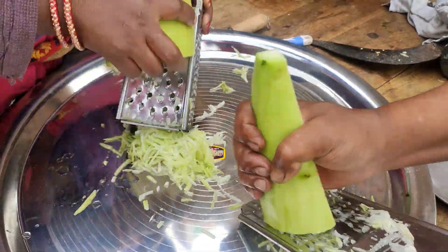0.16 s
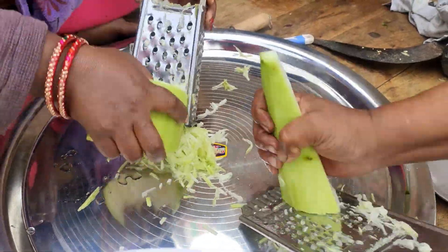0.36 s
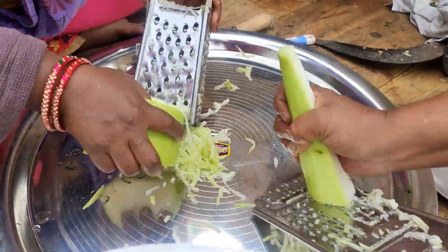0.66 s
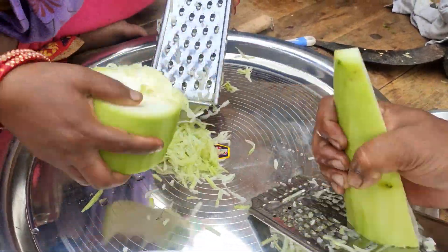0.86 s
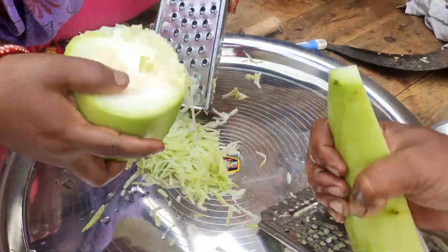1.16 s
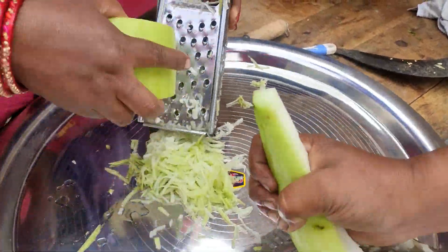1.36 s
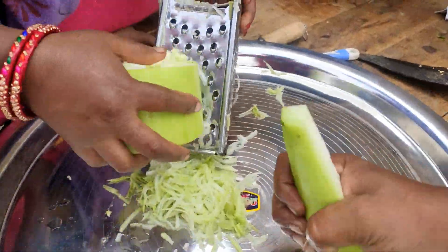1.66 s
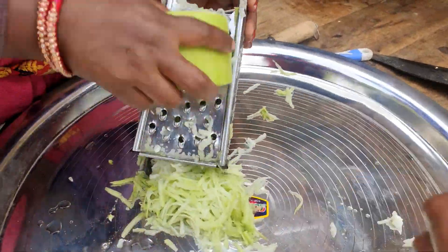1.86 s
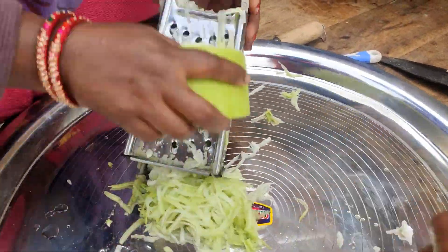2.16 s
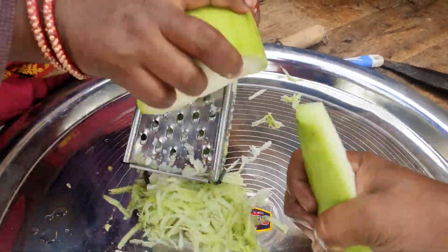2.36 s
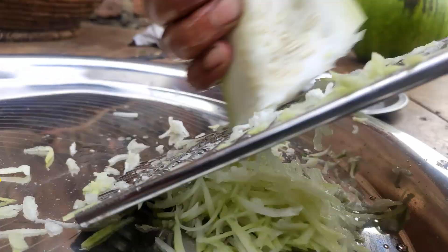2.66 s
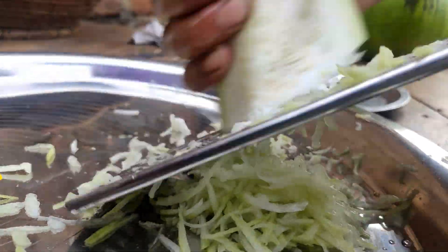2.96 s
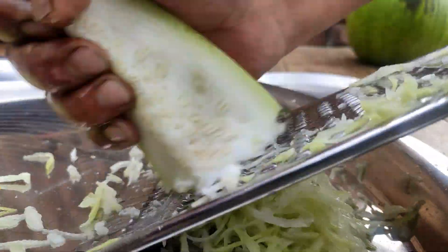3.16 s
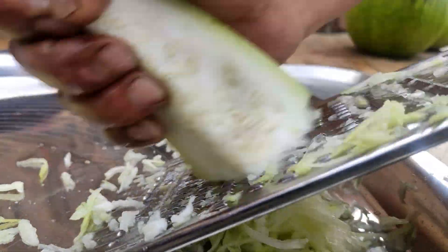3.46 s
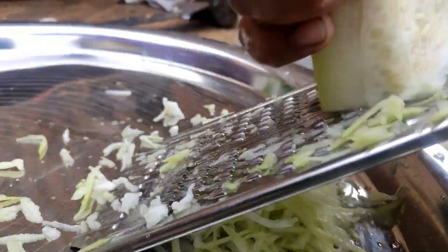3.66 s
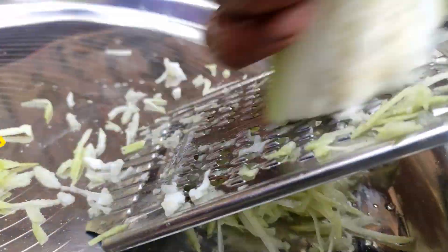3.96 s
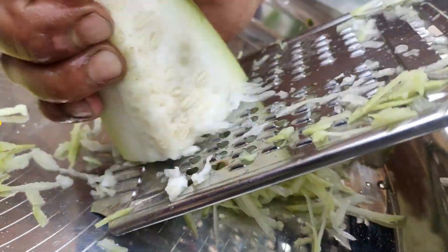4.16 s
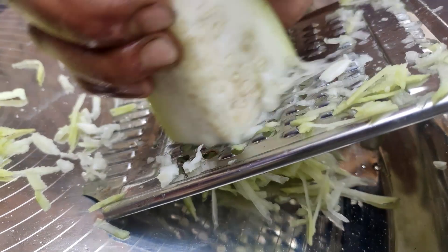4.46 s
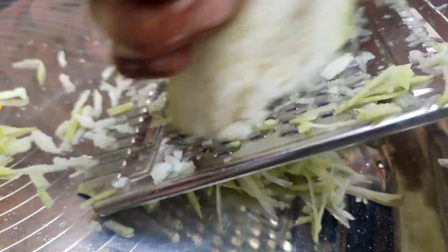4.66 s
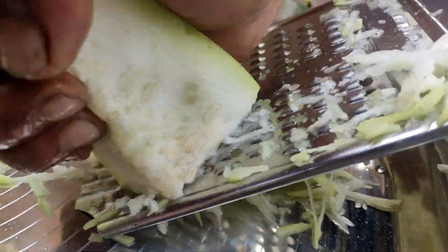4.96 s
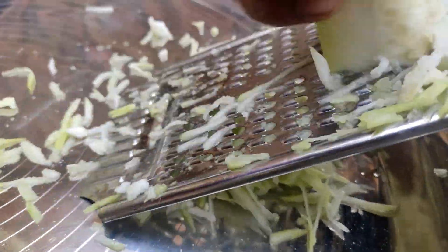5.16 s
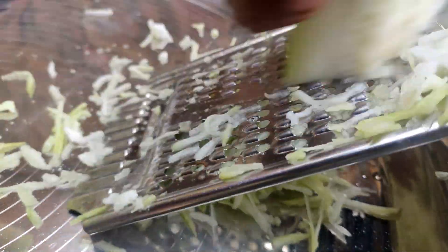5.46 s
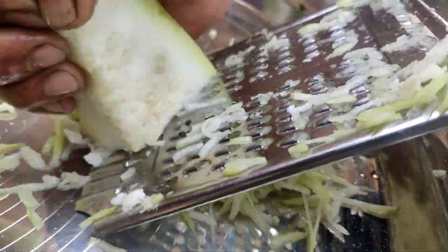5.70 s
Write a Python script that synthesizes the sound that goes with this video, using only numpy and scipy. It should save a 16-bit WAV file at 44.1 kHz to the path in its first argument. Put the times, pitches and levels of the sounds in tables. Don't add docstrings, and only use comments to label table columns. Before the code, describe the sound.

Brisk irregular vegetable grating, heard right beside the plate: dense bright fibre-tearing crackle with a hollow, thin-sheet body. At first moderate strokes with bangle ticks and soft bumps, then a snaggy flurry near 2.8 seconds, a heavy slap and thud near 3.7, and stronger, wetter scraping with low jolts from about 4.9. Slight short reflections, wide treble, centred bass, almost silent yard air.

```python
import sys
import numpy as np
from scipy import signal
from scipy.fft import rfft, irfft, next_fast_len
from scipy.io import wavfile
from scipy.ndimage import uniform_filter1d

SR = 44100
rng = np.random.default_rng(int(sys.argv[2]) if len(sys.argv) > 2 else 0)


def output_pcm(signal):
    pcm = np.clip(np.atleast_2d(signal).T, -1, 1) * 32767
    wavfile.write(sys.argv[1], SR, np.round(pcm).astype(np.int16))


def ratio(d):
    e = np.asarray(d, float) / 20
    return 10 ** e


N = 257103

# pitch_hz, level_db [dB per Hz]
TEAR_COLOUR = [(880, -6.5), (1500, -7), (2450, -9.5), (4100, -6.5), (5600, -7), (10100, -5), (15000, -10.5),
               (17000, -17.5)]
# pitch_hz, level_db [dB per Hz]
SHEET_COLOUR = [(150, -59), (250, -0.5), (530, -23.5), (605, -8), (683, -9.5), (788, -8), (1210, -5),
                (1510, -6), (1820, -7.5), (3500, -11), (4550, -27), (7700, -120)]
# pitch_hz, level_db, t60_s
RIM_MODES = [(494, -10, .24), (520, -11, .07), (690, -2, .03), (754, -12, .06), (950, -4, .035),
             (1400, -8, .025)]


def evened(x):
    return x / np.sqrt(np.mean(x ** 2) + 1e-20)


def read(points, hz):
    f, value = np.transpose(points)
    return np.interp(np.log(hz + 1), np.log(f + 1), value)


def curves(rows):
    s, *columns = np.transpose(rows)
    return [np.interp(np.arange(N) / SR, s, column) for column in columns]


def add(mix, s, sound):
    part = mix[..., round(s * SR):][..., :sound.shape[-1]]
    part += sound[..., :part.shape[-1]]


def sides(db):
    return ratio(np.array([db / 2, -db / 2]))


def ring(hz, t60, rise):
    t = np.arange(round(.3 * SR)) / SR
    return (1 - np.exp(-t / rise)) * ratio(-60 * t / t60) * np.sin(2 * np.pi * hz * t)


def ports(a, b, spectrum):
    # pitch_hz, likeness [0 to 1]
    likeness = [(60, 1), (180, 1), (550, 1), (1200, 0.4), (2500, 0.1), (4970, 0.063), (15000, 0.041)]
    # pitch_hz, lead_rad
    port_lead = [(250, -0.58), (550, -1.03), (1210, -1.5), (1980, -2.5), (4000, -2.5)]
    size = next_fast_len(N)
    hz = np.fft.rfftfreq(size, 1 / SR)
    same = np.clip(read(likeness, hz), 0, 1)
    one, two = rfft(a, size), rfft(b, size)
    wide = (1 - np.sqrt(1 - same ** 2)) / 2
    along, across = np.sqrt(1 - wide), np.sqrt(wide)
    turn = np.exp(.5j * read(port_lead, hz))
    left = (along * one + across * two) * turn
    right = (along * two + across * one) / turn
    pair = np.array([left, right]) * ratio(read(spectrum, hz))
    return evened(irfft(pair, size)[:, :N])


def flicker(per_s, depth_db):
    width = max(int(SR / per_s), 1)
    lumps = uniform_filter1d(uniform_filter1d(rng.standard_normal(N), width), width)
    return ratio(depth_db * evened(lumps))


def crackle(spectrum, spread_db, shared):
    size = ratio(spread_db * np.minimum(rng.exponential(1, N), 4.5)) * shared
    left, right = size * rng.standard_normal((2, N))
    return ports(left, right, spectrum)


def patchy(x, depth_db, bins, frames):
    z = signal.stft(x, nperseg=256)[2]
    patches = uniform_filter1d(rng.standard_normal(z.shape[1:]), bins, 0)
    patches = evened(uniform_filter1d(patches, frames, 1))
    return evened(signal.istft(z * ratio(depth_db * patches), nperseg=256)[1][:, :N])


def drops(per_s, low_hz, high_hz, cycles, count):
    out = np.zeros((2, N))
    for hz in np.geomspace(low_hz, high_hz, count):
        grain = ring(hz, cycles / hz, 0.5 / hz)[:2000]
        pair = sides(rng.normal(0, 12.3))[:, None] * rng.choice([-1, 1], (2, 1)) * grain
        for place, luck in rng.random((int(per_s / count * N / SR), 2)):
            size_db = 3.7 * min(-np.log(1 - luck), 3)
            add(out, place * N / SR, ratio(size_db) * pair)
    return evened(out)


def hand(bluntness):
    # touch_s, speeding_up_s, slowing_down_s, tearing_db
    pushes = [(.04, 0.067, 0.1, -34.5), (.338, 0.06, 0.15, -34.5), (.61, 0.12, 0.12, -35),
              (.972, 0.079, 0.074, -42), (1.287, 0.083, 0.042, -35.5), (1.64, 0.063, 0.068, -36),
              (1.955, 0.079, 0.063, -30.5), (2.23, 0.094, 0.09, -38), (2.3, 0.057, 0.16, -39.5),
              (2.872, 0.06, 0.072, -33), (3.195, 0.068, 0.08, -34), (3.27, 0.059, .1, -36.5),
              (3.523, 0.054, 0.11, -35.5), (3.832, 0.095, 0.093, -38), (4.142, 0.12, 0.083, -37),
              (4.519, 0.057, .15, -35), (4.9, 0.076, 0.071, -27.5), (5.0, 0.038, 0.1, -39),
              (5.18, 0.079, 0.027, -28), (5.298, 0.12, 0.047, -30.5), (5.438, 0.055, 0.069, -27.5),
              (5.694, 0.06, 0.1, -27)]
    # touch_s, speeding_up_s, slowing_down_s, tearing_db
    drags = [(-.05, 0.041, 0.092, -49.5), (.172, 0.099, .02, -46.5), (.266, 0.063, 0.016, -51.5),
             (.484, 0.059, 0.11, -45.5), (.9, 0.042, 0.046, -47), (1.162, 0.019, 0.14, -52.5),
             (1.53, 0.042, 0.1, -50.5), (1.742, 0.02, 0.2, -54.5), (1.843, 0.061, 0.053, -43.5),
             (2.073, 0.049, .4, -49), (2.164, 0.033, 0.56, -46.5), (2.49, 0.083, 0.05, -40),
             (2.63, 0.048, 0.013, -38), (2.66, 0.1, 0.065, -56), (2.75, 0.032, 0.11, -47),
             (2.98, 0.02, 0.09, -55.5), (3.06, 0.038, 0.26, -45), (3.406, 0.03, 0.086, -39.5),
             (3.655, 0.1, .31, -48.5), (3.716, 0.03, 0.044, -42), (3.996, 0.11, 0.042, -42.5),
             (4.64, 0.024, 0.029, -50), (4.72, 0.045, 0.045, -56), (4.775, 0.041, 0.1, -43),
             (5.09, 0.039, 0.077, -45), (5.03, 0.035, 0.067, -51), (5.54, 0.017, .06, -53)]
    # touch_s, speeding_up_s, slowing_down_s, tearing_db
    skims = [
        (1.428, 0.0068, 0.057, -44),
        (4.348, 0.085, 0.079, -43),
        (5.53, .1, 0.071, -38.5),
    ]
    body_slope, usual_db = 0.21, -41
    tear, body = np.zeros(N), np.zeros(N)
    t = np.arange(N) / SR
    for passes, body_db in (pushes, -6), (drags, -2), (skims, -10.5):
        for touch, rise, fall, db in passes:
            fastest, lift = touch + rise, touch + rise + fall
            now = slice(max(round(touch * SR), 0), round(lift * SR))
            arch = np.interp(t[now], [touch, fastest, lift], [0, np.pi / 2, np.pi])
            speed = np.sin(arch) ** bluntness
            sheet_db = db + body_db - body_slope * (db - usual_db)
            tear[now] += (ratio(db) * speed) ** 2
            body[now] += (ratio(sheet_db) * speed) ** 2
    return np.sqrt(tear), np.sqrt(body)


def rasp():
    # time_s, left_right_db
    grater_lean = [(0, -0.5), (2, -.5), (3.5, -2), (4.5, -3), (5.1, 0.5), (5.83, 0.5)]
    # time_s, level_db
    free_rim = [(0, -3), (1.5, -19), (1.75, -11), (2.5, -8), (3.5, -4.5), (4.0, -1), (4.9, -6.5), (5.3, -5),
                (5.83, -2.5)]
    cut, press = hand(bluntness=1.335)
    rows = flicker(per_s=160, depth_db=.8) * flicker(per_s=45, depth_db=.8)

    snaps = crackle(TEAR_COLOUR, 1.8, rows * flicker(per_s=700, depth_db=1.2))
    tear = patchy(snaps, 2.14, bins=11, frames=5)
    tear = patchy(tear, 1.5, bins=2, frames=9)
    tear += ratio(-29.5) * drops(500, 3480, 13300, 53, count=14)

    body = patchy(crackle(SHEET_COLOUR, 1.9, rows), 2.9, bins=3, frames=5)
    body += ratio(-4.5) * drops(170, 640, 3200, 34, count=10)

    rim = sum(ratio(db) * ring(hz, t60, 0.0029) for hz, db, t60 in RIM_MODES[:2])
    hum = signal.fftconvolve(press * body, rim[None] / np.linalg.norm(rim), axes=1)[:, :N]

    out = ratio(3.0) * cut * sides(*curves(grater_lean)) * tear
    out += ratio(-2.0) * press * body
    out += ratio(-0.5 + curves(free_rim)[0]) * hum
    out += ratio(-8.5) * press * drops(110, 589, 1220, 21, count=8)
    out += ratio(-12.0) * press * drops(120, 1240, 1740, 30, count=5)
    return out


def rumble():
    # time_s, level_db
    shaking = [(0.0, -36), (0.05, -37), (0.66, -42.5), (0.71, -35.5), (0.83, -39), (2.34, -38), (2.35, -33),
               (2.73, -40.5), (2.78, -36.5), (2.91, -37), (3.93, -34.5), (3.96, -24.5), (4.11, -35),
               (5.31, -26), (5.33, -31), (5.42, -24), (5.72, -30.5), (5.83, -19.5)]
    # time_s, level_db
    contact = [(0, 1.5), (.8, 6.5), (1.1, -0.5), (2, 6.5), (2.65, 2.5), (2.8, -0.5), (4.9, -4.5), (5.0, 2),
               (5.3, 4.5), (5.83, -3.5)]
    # pitch_hz, level_db [dB per Hz]
    deep_colour = [(8.8, -27), (15, 2.5), (59, 7), (92, -0.5), (130, -16.5), (170, -11.5), (290, -120)]
    # pitch_hz, level_db [dB per Hz]
    shudder_colour = [(53, -14), (90, 3), (130, 1.5), (199, -6.5), (269, -13), (420, -15.5), (550, -94),
                      (920, -120)]
    shake = ratio(curves(shaking)[0])
    deep = sides(-0.5)[:, None] * ports(*rng.standard_normal((2, N)), deep_colour)
    lumps = flicker(per_s=25.6, depth_db=3.5)
    shudder = ports(*rng.standard_normal((2, N)) * lumps, shudder_colour)
    pressed = hand(bluntness=2.76)[1] ** 0.77
    swell = ratio(-9.5) * shake + ratio(-10) * pressed
    return ratio(-0.16) * shake * deep + swell * shudder * ratio(*curves(contact))


def yard():
    # pitch_hz, level_db [dB per Hz]
    air_colour = [(240, -45), (400, 0), (446, -0.5), (1890, -8), (2240, -10), (2340, -8.5), (4160, -13),
                  (14000, -24.5), (16300, -39)]
    return ratio(-55.5) * ports(*rng.standard_normal((2, N)), air_colour)


def bites():
    # start_s, peak_db, low_part_db [relative]
    slaps = [(0.0183, -25, -6.5), (0.643, -21.5, -9), (1.267, -23.5, -10), (1.3352, -16, -0.5),
             (1.532, -34.5, -4), (1.572, -18.5, -12), (1.625, -25.5, -0.5), (1.839, -36, 10),
             (1.862, -41.5, 12), (2.124, -44, 6), (2.192, -41, 5), (2.275, -29, 8), (2.5249, -21, -7.5),
             (2.668, -26, -12), (1.757, -40, 10), (1.789, -41, 8), (3.0777, -23, 1), (3.6464, -22, -11),
             (3.7333, -11, -3), (3.9176, -18.5, -9.5), (4.538, -24.5, -3), (5.106, -39, 6),
             (5.1242, -17, -7), (5.146, -32.5, 6.5), (5.1762, -22, 1.5)]
    # start_s, peak_db
    snags = [(.133, -28), (.208, -38), (.247, -29), (.277, -29), (2.463, -30), (2.537, -29), (0.931, -21.5),
             (1.872, -18), (2.219, -15), (2.632, -30), (3.009, -38), (3.03, -49), (3.07, -20.5),
             (3.098, -26), (3.146, -26), (3.161, -22), (3.253, -13.5), (3.322, -16), (3.417, -24),
             (3.437, -26), (4.258, -16), (4.301, -19.5), (4.363, -29), (4.4, -31), (4.416, -42),
             (4.701, -26.5), (4.785, -27), (2.354, -21), (2.435, -40), (5.652, -25), (3.8564, -31.5),
             (4.2077, -30), (4.517, -27.5), (4.799, -17.5), (4.905, -27), (5.286, -19), (5.295, -31),
             (5.341, -20), (5.3745, -23), (5.645, -20), (5.826, -13)]
    # start_s, peak_db
    skips = [(2.759, -17.5), (2.771, -24), (2.7838, -19), (2.793, -22), (2.807, -16.5), (2.8244, -19),
             (2.8422, -19.5), (1.768, -42), (1.8, -42), (5.106, -31), (5.118, -28), (5.138, -28)]
    high, low = np.zeros(N), np.zeros(N)
    t = np.arange(round(.15 * SR)) / SR
    # start s, peak dB, low part dB, t60 s
    rows = [(*slap, 0.092) for slap in slaps]
    rows += [(*snag, -23, 0.05) for snag in snags]
    rows += [(*skip, -14, 0.028) for skip in skips]
    for s, db, low_db, t60 in rows:
        fall = ratio(db - 10.0 - 60 * t / t60) * (1 - np.exp(-t / 0.00035))
        add(high, s, fall)
        add(low, s, fall * ratio(low_db + 2.5))
    spread_db = 2.5
    return high * crackle(TEAR_COLOUR, spread_db, 1) + low * crackle(SHEET_COLOUR, spread_db, 1)


def bangles():
    # start_s, peak_db, lower_mode_hz, left_right_db
    clear_ticks = [(.0187, -36, 7900, -6), (0.209, -31.5, 9050, 7), (.5003, -33.5, 9100, 6),
                   (.607, -34.5, 8500, 0), (.7462, -38, 8450, -.5), (.8046, -35.5, 8900, 1),
                   (0.929, -31.5, 7920, -1), (.989, -36, 9050, 3), (1., -43, 8550, 18.5),
                   (1.872, -30, 9000, -5), (1.9093, -37, 8200, -2), (2.1188, -34, 9000, 9),
                   (2.4149, -30, 8980, 7), (2.5606, -33.5, 8140, 7), (2.583, -33, 9000, 4),
                   (2.5874, -30, 8900, 4), (2.601, -29.5, 8550, 5), (2.63, -33, 8300, 10.5),
                   (2.772, -30, 7700, 2), (2.782, -36, 7300, -2), (2.806, -42, 9700, 2),
                   (3.397, -39, 9300, 5), (3.75, -29, 8600, 10), (3.754, -31, 8360, 3),
                   (3.95, -35, 9800, -2), (4.0028, -36, 11900, 10), (4.312, -37, 9790, -1),
                   (4.798, -29.5, 9030, -2), (5.144, -28.5, 8200, 4.5), (5.288, -33, 7950, 8)]
    # start_s, peak_db
    faint_ticks = [(.591, -41), (.642, -46), (.8134, -43), (.8889, -41), (.9088, -43), (1.483, -38),
                   (1.499, -39.5), (1.928, -37.5), (2.134, -37), (2.167, -37), (2.463, -38), (2.8235, -41),
                   (2.843, -48), (3.071, -43), (4.02, -41), (4.8796, -32), (4.886, -43), (4.903, -41)]
    out = np.zeros((2, N))
    faint = [(*row, rng.normal(8550, 580), 4) for row in faint_ticks]
    for s, db, hz, pan_db in [*clear_ticks, *faint]:
        upper_db = -11 + 0.79 * pan_db
        tick = ring(hz, .007, .0005) + .6 * ring(1.09 * hz, .006, .0004)
        tick += ratio(upper_db + 2) * ring(1.36 * hz, .007, .0005)
        click = ring(.55 * hz, .003, .0001) + ring(1.65 * hz, .003, .0001)
        tick += ratio(-10) * click
        pair = np.array([tick, np.roll(tick, rng.integers(0, 6))])
        add(out, s, ratio(db + 13.5) * sides(pan_db)[:, None] * pair)
    return out


def plate_bumps():
    # start_s, peak_db, thud_hz, rim_ring_db [relative]
    bumps = [(0.083, -27.5, 206, -35), (0.286, -26.5, 194.4, -31), (0.372, -23.5, 166, -30),
             (0.469, -40, 188, -30), (.528, -42, 221, -30), (0.55, -30, 166, -30), (0.666, -27, 263, -22),
             (0.697, -21, 79, -32), (0.717, -25, 221, -20), (.905, -29, 152, -23), (1.223, -36, 308, -30),
             (1.244, -43, 285, -30), (1.335, -15, 141.4, -38), (2.197, -23, 265, -20),
             (2.22, -24, 243, -12), (5.299, -22, 242, -20), (5.317, -15, 122, -23),
             (1.527, -30.5, 154, -26), (1.757, -38.5, 153, 18), (1.839, -20, 198, -3),
             (1.862, -21.5, 156, 10), (1.999, -29, 80.5, 12), (2.124, -17.5, 190.5, -3),
             (2.193, -20, 105, 15), (2.274, -19, 188.5, 4), (2.359, -21, 79, 3),
             (2.541, -28.5, 82.5, -29.5), (2.555, -29.5, 198.5, -24), (2.767, -20, 80.5, -25),
             (2.78, -26, 118, 2), (2.812, -19, 69.6, -29), (3.078, -18, 120, 1.5), (3.732, -5.5, 118, -34),
             (3.746, -18.5, 131, 2), (3.765, -22, 150, 5), (3.944, -17.5, 81.4, -3),
             (3.972, -25, 86.7, -22), (0.104, -23.5, 201.5, -30), (.245, -31, 247, -22),
             (4.943, -29, 103, 3), (5.068, -37, 101, 6), (5.125, -38, 101, -4), (5.138, -32, 100, 9),
             (5.371, -23, 100, 10.5), (5.105, -18, 81, 4), (5.174, -23, 196.3, -17),
             (5.298, -10.5, 129, 7.5), (5.754, -26, 77, 5)]
    # pitch_hz, t60_s
    thud_decay = [(80, 0.12), (119, 0.039), (152, 0.081), (200, 0.13), (260, 0.042)]
    rim_alike = np.array([9, 9, 9, 1, 1, 0])
    out = np.zeros((2, N))
    for s, db, hz, rim_db in bumps:
        luck = rng.standard_normal((2, len(RIM_MODES)))
        t60 = read(thud_decay, hz)
        modes = np.array([ratio(mode_db) * ring(mode_hz * (1 + 0.015 * drift), mode_t60, 0.00069)
                          for (mode_hz, mode_db, mode_t60), drift in zip(RIM_MODES, luck[0])])
        gains = ratio(0.85 * luck) * np.sign(luck + rim_alike)
        rim = gains @ modes
        thud = ring(hz, t60, 0.0033) + ratio(-16.5) * ring(2.5 * hz, 1.11 * t60, 0.015)
        thud = thud * sides(1.7 * luck[1, 0])[:, None]
        add(out, s, ratio(db + 2.5) * (ratio(rim_db - 14.0) * rim - thud))
    return out


def pitched_pops():
    # start_s, peak_db, pitch_hz
    pops = [(3.733, -29, 3360), (3.734, -30, 4600), (3.735, -26, 2250), (1.336, -21, 850),
            (1.338, -28, 3030), (1.339, -27, 5100), (1.863, -28, 766), (1.87, -38, 1900),
            (2.195, -32, 1900), (3.75, -22, 310), (.095, -30, 1240), (2.193, -35, 1000),
            (2.197, -27.5, 1490), (2.203, -22, 845), (2.221, -35, 990), (2.275, -23, 1250),
            (2.285, -23, 970), (2.526, -42, 950), (3.59, -29, 720), (3.62, -30.5, 720), (5.299, -21, 1190),
            (5.306, -21, 840), (.645, -44, 1010), (1.758, -42, 970), (1.762, -36, 1610), (1.768, -28, 890),
            (1.783, -32, 950), (1.789, -31, 1030), (1.798, -35, 1000), (1.804, -35, 1150),
            (1.839, -29, 1000), (3.75, -32, 1010), (3.737, -21, 1910), (3.742, -28, 1650),
            (5.106, -29, 1520), (5.226, -37, 1500), (5.382, -26, 1480), (2.301, -26, 1360),
            (2.548, -30, 990), (4.213, -25, 1340), (.245, -45, 800), (5.033, -27, 560), (5.07, -33, 520),
            (1.99, -29, 880), (2.0, -34, 620), (3.437, -41, 1080), (4.262, -38, 606), (4.398, -38, 1650),
            (4.6, -28, 500), (4.665, -34, 800), (4.967, -30, 1490), (4.987, -17, 1620), (5.125, -21, 1520),
            (5.138, -18.5, 1390), (5.175, -24, 1270), (5.209, -23, 1590), (5.246, -36, 1050),
            (5.248, -28, 1640), (5.271, -17, 1730), (5.371, -23, 1550), (5.477, -20, 1540),
            (5.523, -21, 1550)]
    out = np.zeros((2, N))
    for s, db, hz in pops:
        pop = ring(hz, .02, 0.0005) + .5 * ring(0.63 * hz, .02, 0.0024)
        pop = ratio(db + 4.5) * pop
        add(out, s, np.array([pop, np.roll(pop, 11)]))
    return out


def hand_jolts():
    # start_s, peak_db, pitch_hz
    jolts = [(0.921, -26, 60), (1.386, -26.5, 69.4), (0.122, -23, 110), (0.759, -26, 75), (2.046, -21, 85),
             (2.075, -23, 70), (4.286, -17, 75.4), (4.398, -20, 59.6), (4.588, -19.5, 95), (4.61, -34, 70),
             (4.649, -21, 70.4), (4.69, -19, 60), (5.032, -33, 50), (5.125, -21, 90), (5.436, -14.5, 80.6),
             (5.472, -12, 70)]
    out = np.zeros((2, N))
    for s, db, hz in jolts:
        lurch = ring(hz, 4.3 / hz, 0.0022)
        add(out, s, -ratio(db + 5.0) * lurch * sides(1.4)[:, None])
    return out


def walls(x, t60=0.1, wet_db=-16):
    t = np.arange(round(.2 * SR)) / SR
    signs = rng.choice([-1., 1.], (2, len(t)))
    sparse = (rng.random((2, len(t))) < .05) * (t > .002)
    taps = signs * sparse * ratio(-60 * t / t60)
    return x + ratio(wet_db) * signal.fftconvolve(x, taps / np.linalg.norm(taps[0]), axes=1)[:, :N]


def scene():
    hits = bites() + bangles() + plate_bumps() + pitched_pops() + hand_jolts()
    return rasp() + rumble() + yard() + walls(hits)


def band_limit(x):
    return signal.sosfilt(signal.butter(12, 16470, fs=SR, output="sos"), x)


def record(dry):
    edge = signal.firwin(1001, 15800, window=("kaiser", 7), fs=SR)
    limited = signal.oaconvolve(dry, edge[None], "same")
    leak = ratio(-38) * (dry - limited)
    return band_limit(limited + leak)


dry = scene()
out = record(dry)
output_pcm(out)
```